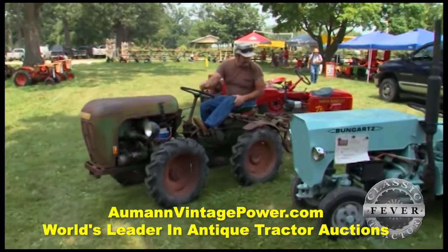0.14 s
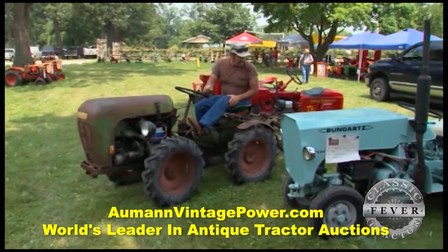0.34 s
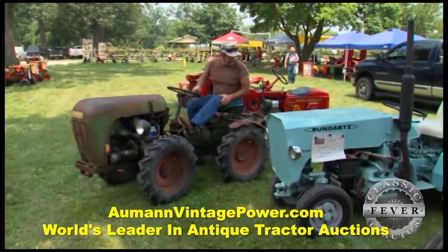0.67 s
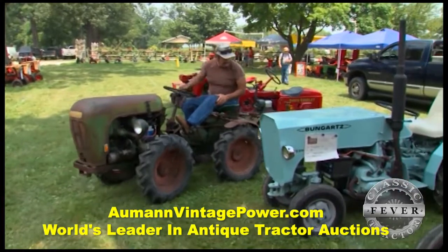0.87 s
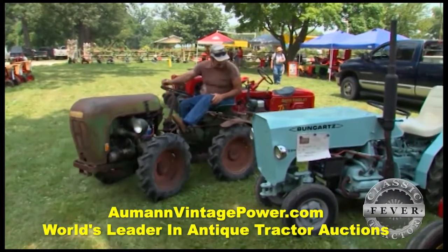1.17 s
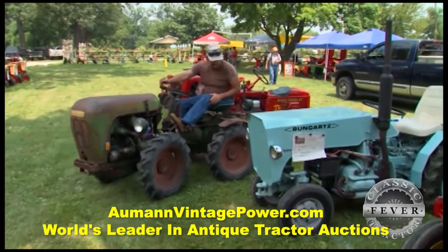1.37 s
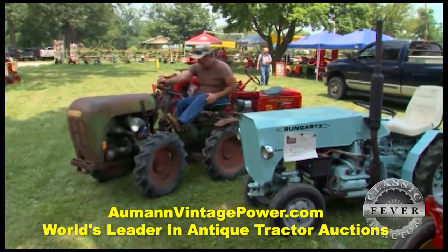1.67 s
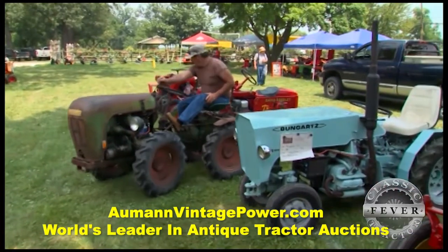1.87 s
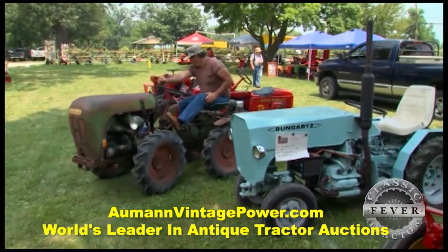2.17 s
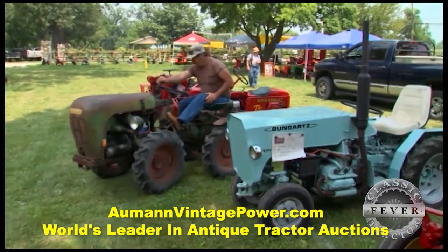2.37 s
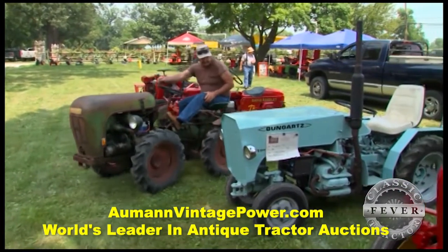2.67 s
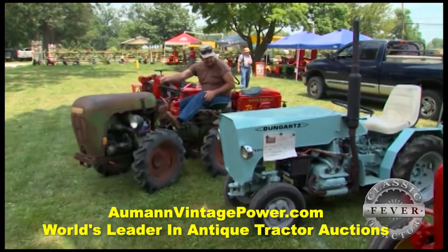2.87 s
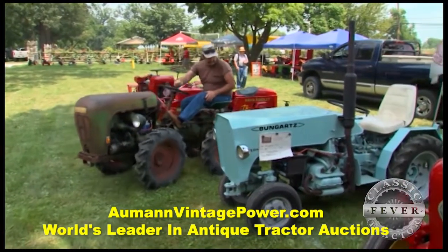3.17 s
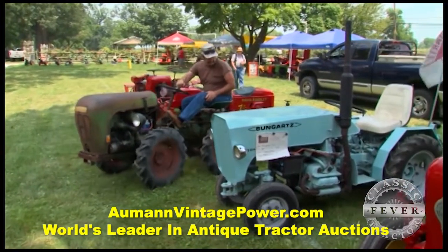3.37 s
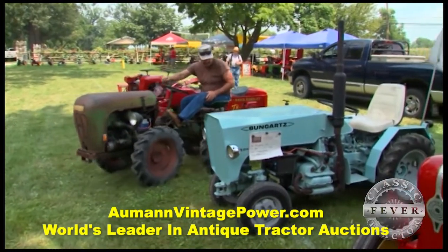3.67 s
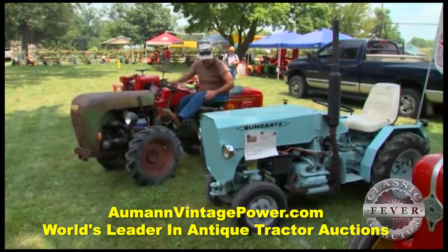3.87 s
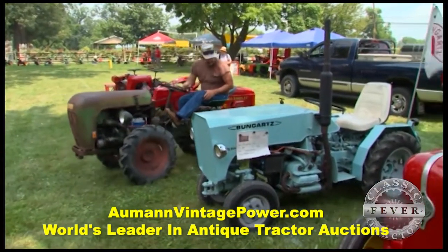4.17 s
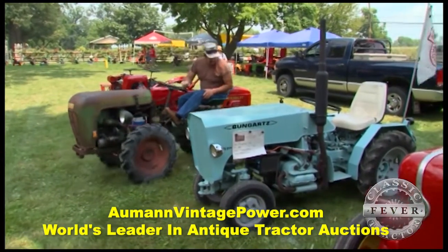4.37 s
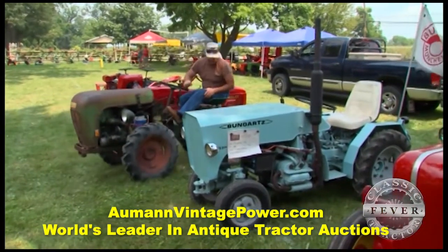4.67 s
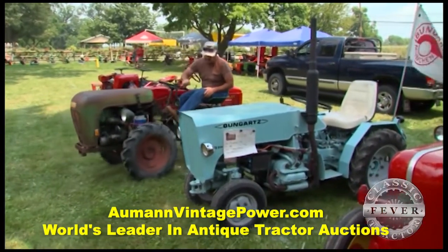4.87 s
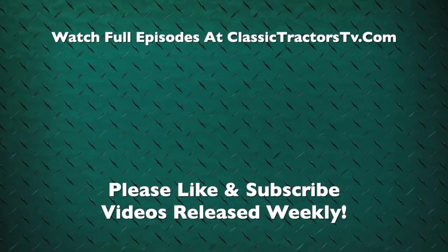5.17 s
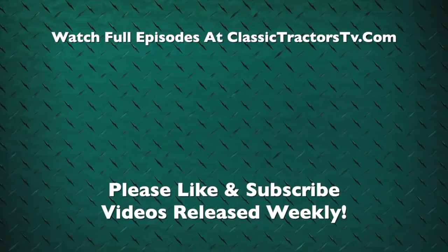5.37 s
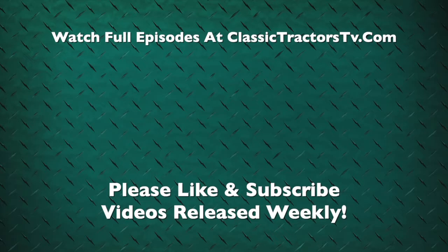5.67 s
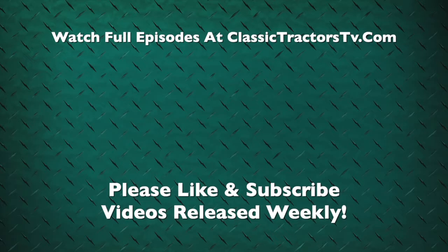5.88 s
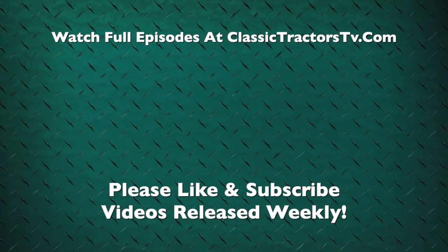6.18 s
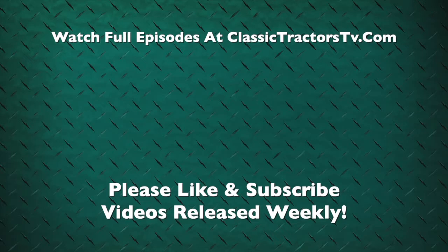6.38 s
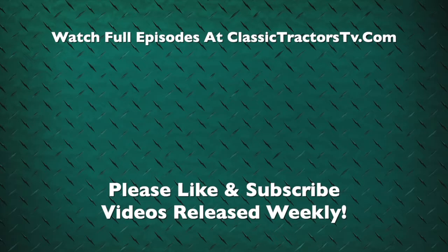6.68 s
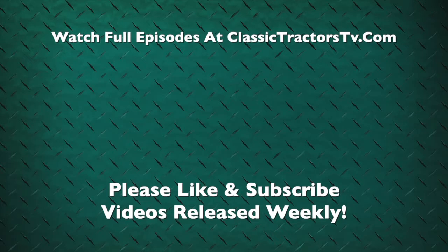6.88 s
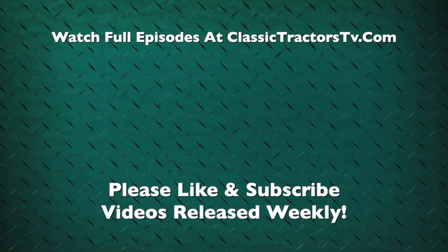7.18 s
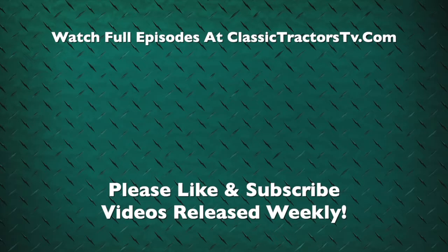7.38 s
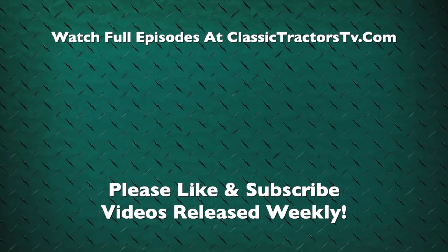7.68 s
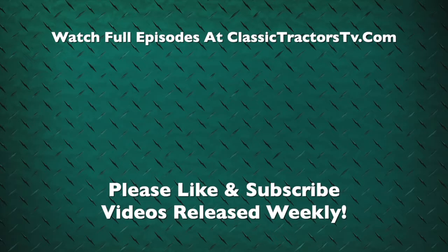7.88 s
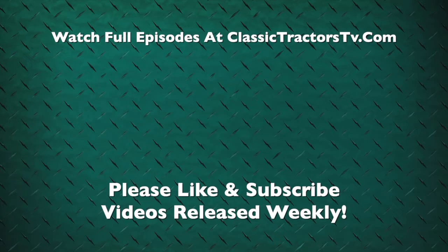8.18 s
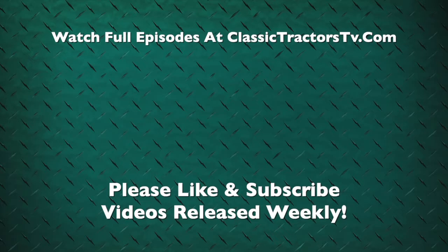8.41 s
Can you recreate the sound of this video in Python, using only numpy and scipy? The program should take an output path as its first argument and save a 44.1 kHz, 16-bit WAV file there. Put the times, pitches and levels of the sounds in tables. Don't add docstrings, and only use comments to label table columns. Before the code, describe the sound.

A small single-cylinder diesel tractor engine putters steadily close by outdoors, fast even thumping exhaust with metallic clatter, then fades out at the end.

```python
import sys
import numpy as np
from scipy import signal
from scipy.fft import rfft, irfft
from scipy.io import wavfile
from scipy.ndimage import uniform_filter1d

SR = 44100
rng = np.random.default_rng(int(sys.argv[2]) if len(sys.argv) > 2 else 0)


def master(y):
    cut = np.clip(np.atleast_2d(y).T, -1, 1)
    pcm = np.round(cut * 32767)
    wavfile.write(sys.argv[1], SR, pcm.astype(np.int16))


def gain_from_db(level_db):
    decades = np.asarray(level_db, float) / 20
    return 10 ** decades


N = 376846

# t/s, speed/rpm
SPEED_RPM = [(0.0, 986.1), (0.62, 932.3), (1.47, 921.1), (1.84, 931.3), (3.15, 1017.9), (3.31, 1034.2),
             (3.87, 1063.3), (4.25, 1075.5), (5.23, 1074.3), (6.39, 1049.2), (6.82, 1033.6), (7.21, 1035.9),
             (8.02, 1012.5), (8.55, 1005.6)]
# t/s, nearness/dB, silencer swing/dB
PATH_DB = [(0, 0, -3.5), (.5, 0, -2), (1.2, -0.5, -4.5), (2, -0.8, 5), (2.7, .8, 3), (3.1, 0.95, -10),
           (3.6, -1, 0.5), (4.2, -0.4, 6), (4.9, -0.95, 5), (5.5, 0.3, 8), (6.1, 0.3, 8), (6.6, 0.25, 0.5),
           (7.3, .4, -2), (8.1, -0.1, -7)]
# f/Hz, t60/s, rise/ms, drift over the turn/dB
DUCTS = [(59, .092, .8, -3.8), (102, .08, .65, 4.5), (141, .13, .1, -6), (187, .09, .1, -.4)]
PORTS = [
    (-.385, 1.34, .1, 1.1, 0),
    (-.235, -.55, .8, -.1, -.37),
    (-.099, .5, 1.7, .56, -1.03),
    (-.011, .63, .8, -.4, -1.3),
    (.142, -.9, .13, -.17, .44),
    (.463, -.63, 0, -1.05, -.1),
]
PORT_GROWTH_DB = [7.3, -7.3, 1.9, 0, 3.3, -5.8]
# f/Hz, t60/s
SHELL_MODE = (304, 0.26)
# f/Hz, t60/s
PANEL_MODE = (243, 0.46)
# place/turn, level on bonnet/dB, level on block/dB
KNOCKS = [(-.35, 5, -2.5), (-.2, -9.5, 1), (-.06, -4, -4.5), (.015, 6, -4), (0.097, -4, -7),
          (0.299, -8.5, -6)]
# f/Hz, t60/s, level at first/dB, half-way/dB, at last/dB
BONNET_MODES = [(246, 0.063, -42, -33.5, -9), (327.8, 0.14, -3, -10.5, -6.5),
                (360.5, 0.045, -9.5, -5.5, -5), (457, 0.076, -4.5, -3, -20), (494.3, 0.089, -3, 0, 3),
                (535, 0.15, -7.5, -6.5, 0), (561.5, 0.064, -4.5, -3, -9.5), (614, 0.084, -9, 0.5, -2.5),
                (652, 0.078, -7, -6, -8), (685, 0.033, -9, 1, -11)]
# f/Hz, t60/s, level at first/dB, half-way/dB, at last/dB
BLOCK_MODES = [(822, 0.054, 1, -2.5, 0), (924.5, 0.1, -2, -4, -7), (1000, 0.043, 3.5, -0.5, 0),
               (1131, 0.11, -6.5, -7, -12.5), (1210, 0.083, -12, -6, -7.5), (1345, 0.062, -3.5, 0.5, -4),
               (1445, 0.042, 6, 1, -6), (1554, 0.017, 7.5, 5, 5), (1716, 0.12, -9, 1, -3.5),
               (1882, 0.051, 0, 4, -10.5), (2340, 0.029, -6, -0.5, -5), (2667, 0.048, -2, -1, -6),
               (3105, .02, -9, -2, -30), (3370, 0.019, -13, -5.5, -4)]
# place/turn, rise/turn, fall/turn, rush/dB, whistle/dB, hiss/dB
BURSTS = [(-.37, 0.076, .14, -12, 4.5, 2), (-.2, .04, 0.058, -21, -3, -6),
          (-.05, 0.05, 0.1, -9.5, -1.5, -4), (.07, 0.046, 0.094, -11, -17, 1),
          (0.169, 0.013, 0.16, -18, -9, -8)]
# f/Hz, level/dB per Hz
RUSH_SPECTRUM = [(200, -40), (350, -17), (500, -11), (640, -10), (800, -13), (1200, -15),
                 (1720, -15), (2640, -18), (3430, -23.5), (3760, -29.5), (4900, -35), (5120, -46.5),
                 (5500, -38), (6800, -45), (9000, -45.5), (12500, -46.5), (13700, -62)]
# f/Hz, width/Hz, level/dB
WHISTLES = [(7650, 970, 4), (5760, 930, -8.5), (6690, 67, -10)]
# f/Hz, level/dB per Hz
HISS_SPECTRUM = [(8500, -17), (10000, -13), (10900, -1.5), (12700, -2), (13000, -5), (13700, -8),
                 (14200, -50)]
# f/Hz, t60/s
FUEL_PIPE_MODE = (4650, 0.0046)
# f/Hz, level/dB per Hz
RUMBLE_SPECTRUM = [(15, -8), (30, -5), (100, -11.5), (250, -19), (600, -44), (1300, -90)]
EXHAUST_MIX = (-19.5, 0.64, 0.16, .01)
SILENCER_MIX = (-35.5, .1, -5.5, 0.8)
PANEL_MIX = (-46, -3, 10, -0.55)
BONNET_MIX = (-33.5, -1.7, 0.1, 0.02)
RUSH_MIX = (-36, -0.65, -0.56, 0.03)
LEAK_MIX = (-58.5, 1.7, -0.6, .01)
FUEL_MIX = (-58.5, 5.5, -13.5, -.3)

PUFF_SCATTER_DB = 0.35


def along(table):
    s, *columns = np.transpose(table)
    return [np.interp(np.arange(N) / SR, s, column) for column in columns]


def level(x, db):
    return x * gain_from_db(db) / np.sqrt(np.mean(x ** 2))


def noise(spectrum):
    hz, db = np.transpose(spectrum)
    bin_hz = np.maximum(np.arange(N // 2 + 1) * SR / N, 1)
    gain = gain_from_db(np.interp(np.log(bin_hz), np.log(hz), db))
    return level(irfft(rfft(rng.standard_normal(N)) * gain, N), 0)


def ring(x, hz, t60_s):
    pole = np.exp(2j * np.pi * hz / SR - np.log(1000) / (t60_s * SR))
    return signal.lfilter([1], [1, -pole], x).imag


def narrow(white, hz, t60_s):
    return level(ring(ring(white, hz, t60_s), hz, t60_s), 0)


def beats(place, scatter_db):
    start_turn, jitter_ms = 0.4, 0.03
    turns = start_turn + np.cumsum(along(SPEED_RPM)[0]) / 60 / SR
    count = np.arange(int(turns[-1]) + 1)
    chance = rng.standard_normal((len(count), 2))
    at = np.interp(count + place, turns, np.arange(N), -N, 2 * N)
    at = at + chance[:, 0] * jitter_ms * SR / 1000
    inside = (at > 0) & (at < N - 1)
    clicks = np.zeros(N)
    clicks[at[inside].astype(int)] = gain_from_db(scatter_db * chance[inside, 1])
    return clicks


def swell(x, rise_s, fall_s):
    t = np.arange(int(7 * fall_s * SR)) / SR
    bump = (1 - np.exp(-(t / rise_s) ** 2)) * np.exp(-t / fall_s)
    return signal.fftconvolve(x, bump / bump.max())[:N]


def exhaust(turned):
    trains = []
    for row, growth_db in zip(PORTS, PORT_GROWTH_DB):
        trains.append(beats(row[0], PUFF_SCATTER_DB) * gain_from_db(growth_db * turned))
    out = 0
    for k, (hz, t60_s, rise_ms, drift_db) in enumerate(DUCTS):
        push = sum(row[k + 1] * train for row, train in zip(PORTS, trains))
        fast_s = 1 / (1 / t60_s + 1000 / (rise_ms * np.log(1000)))
        out = out + gain_from_db(drift_db * turned) * (ring(push, hz, t60_s) - ring(push, hz, fast_s))
    return out / np.sqrt(uniform_filter1d(out ** 2, SR // 2))


def silencer_and_panel():
    opens, surge, echo = (beats(PORTS[k][0], PUFF_SCATTER_DB) for k in (0, 2, 4))
    silencer = ring(opens + 0.19 * surge - 0.52 * echo, *SHELL_MODE)
    return level(silencer, 0), level(ring(-surge, *PANEL_MODE), 0)


def body(blows, modes, turned, share_db):
    out = 0
    for k, (hz, t60_s, *dbs) in enumerate(modes):
        gain = gain_from_db(np.interp(turned, [0, 0.5, 1], dbs))
        out = out + (-1) ** k * gain * ring(blows, hz, t60_s)
    return level(out, share_db)


def bonnet_and_block(turned):
    rattle_ms, drift_rad, knock_scatter_db = 1.6, 7, 1.1
    lag = np.arange(int(5 * rattle_ms * SR / 1000)) * 1000 / (rattle_ms * SR)
    rattles = rng.standard_normal((len(KNOCKS), 2, len(lag))) * lag * np.exp(-1.5 * lag)
    blend = np.array([np.cos(drift_rad * turned), np.sin(drift_rad * turned)])
    slap, clatter = 0, 0
    for (place, bonnet_db, block_db), rattle in zip(KNOCKS, rattles):
        train = beats(place, knock_scatter_db)
        slap = slap + gain_from_db(bonnet_db) * train
        rattled = signal.oaconvolve(train * blend, rattle, axes=1).sum(axis=0)[:N]
        clatter = clatter + gain_from_db(block_db) * rattled
    return body(slap, BONNET_MODES, turned, -2.5), body(clatter, BLOCK_MODES, turned, -5)


def burst_bumps():
    turn_s, scatter_db = 0.059, 1.6
    return [swell(beats(place, scatter_db), rise * turn_s, fall * turn_s)
            for place, rise, fall, *_ in BURSTS]


def gate(bumps, column, steady_db):
    return gain_from_db(steady_db) + sum(gain_from_db(row[column]) * bump for row, bump in zip(BURSTS, bumps))


def gas_flow(bumps, faster):
    fill_db_per_100_rpm = 2
    grit = gain_from_db(1.1 * noise([(5, 0.5), (150, -5), (500, -41), (900, -63)]))
    return gate(bumps, 3, -7.5 + fill_db_per_100_rpm * faster) * grit


def gas_rush(flow):
    return level(noise(RUSH_SPECTRUM) * flow, -1.7)


def leaks(bumps):
    white = rng.standard_normal(N)
    whistle = sum(gain_from_db(db) * narrow(white, hz, np.log(1000) / (np.pi * width_hz))
                  for hz, width_hz, db in WHISTLES)
    whistle = level(whistle * gate(bumps, 4, -14.5), -1.2)
    return whistle + level(noise(HISS_SPECTRUM) * gate(bumps, 5, -17), -7)


def fuel_pipe(flow):
    return level(narrow(rng.standard_normal(N), *FUEL_PIPE_MODE) * flow, 0)


def rumble():
    return level(noise(RUMBLE_SPECTRUM), -38)


def scene():
    turned = np.arange(N) / N
    near_db, swing_db = along(PATH_DB)
    faster = (along(SPEED_RPM)[0] - 1000) / 100

    def heard(db, rev_db, turn_db, share):
        return gain_from_db(db + near_db + rev_db * faster + turn_db * turned + share * swing_db)

    silencer, panel = silencer_and_panel()
    bonnet, iron = bonnet_and_block(turned)
    bumps = burst_bumps()
    flow = gas_flow(bumps, faster)
    mix = exhaust(turned) * heard(*EXHAUST_MIX)
    mix = mix + silencer * heard(*SILENCER_MIX) + panel * heard(*PANEL_MIX)
    mix = mix + bonnet * heard(*BONNET_MIX)
    mix = mix + (iron + gas_rush(flow)) * heard(*RUSH_MIX)
    mix = mix + leaks(bumps) * heard(*LEAK_MIX) + fuel_pipe(flow) * heard(*FUEL_MIX)
    return (mix + rumble())[None]


def top_cut(x):
    return signal.sosfilt(signal.butter(12, 13760, fs=SR, output="sos"), x)


def record(dry):
    fade_end_s, fade_s, fade_bend, gain_db = 8.55, 0.4, 1.16, 1.5
    thin = signal.sosfilt(signal.butter(3, 42, "high", fs=SR, output="sos"), dry)
    fade = np.clip((fade_end_s - np.arange(N) / SR) / fade_s, 0, 1) ** fade_bend
    return top_cut(thin * fade * gain_from_db(gain_db))


dry = scene()
out = record(dry)
master(out)
```